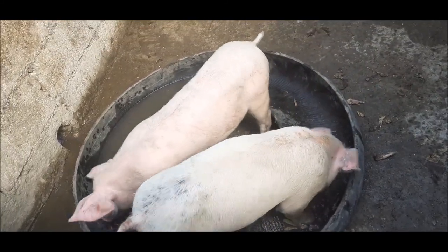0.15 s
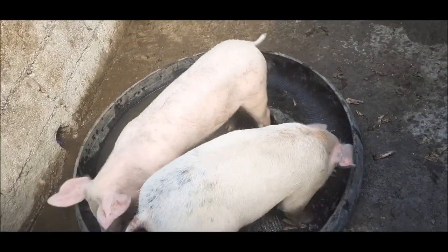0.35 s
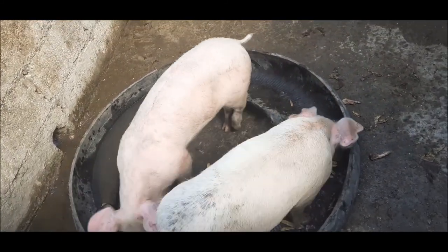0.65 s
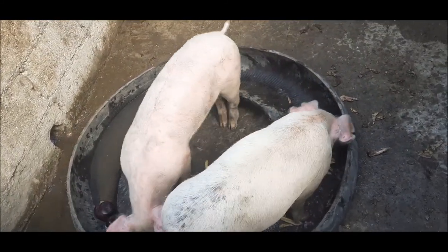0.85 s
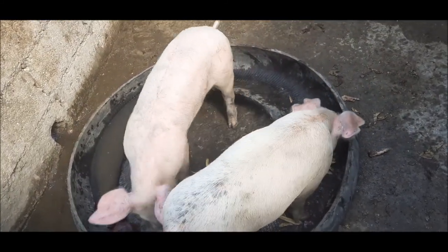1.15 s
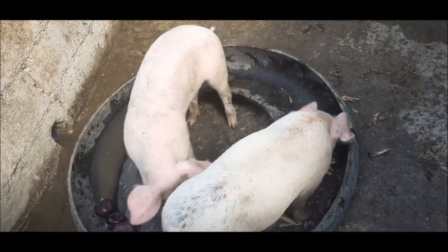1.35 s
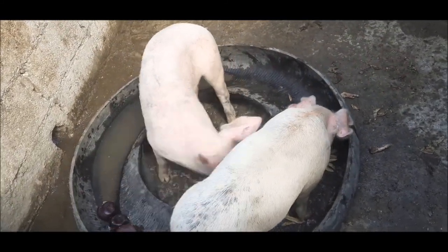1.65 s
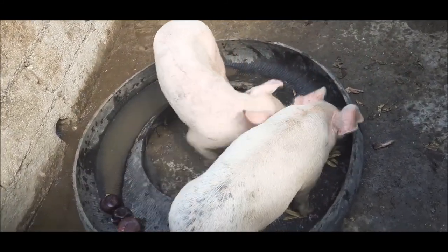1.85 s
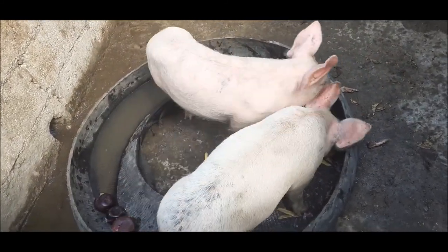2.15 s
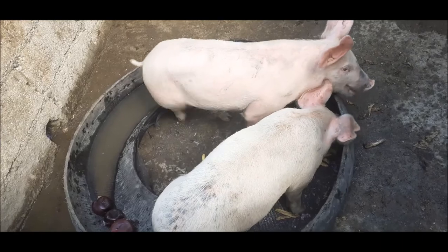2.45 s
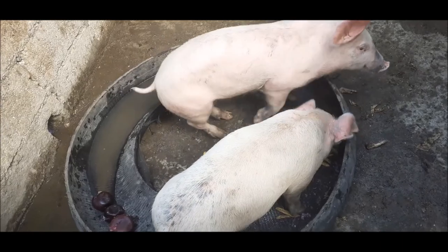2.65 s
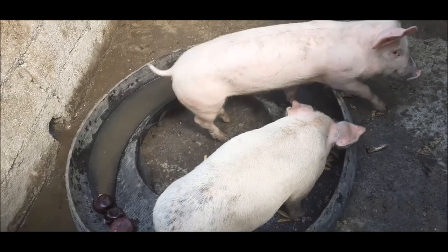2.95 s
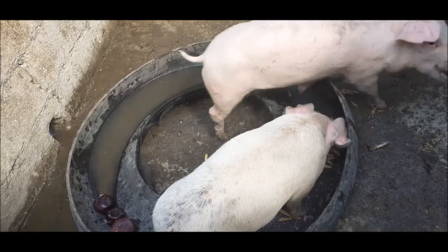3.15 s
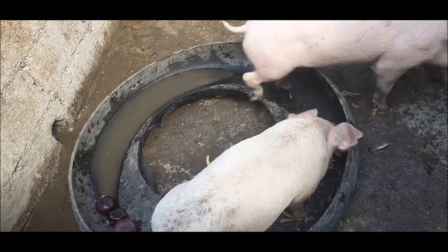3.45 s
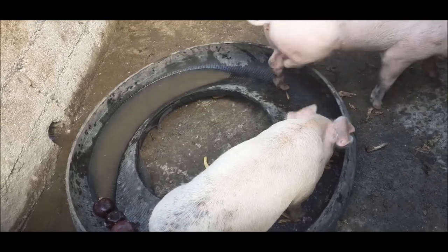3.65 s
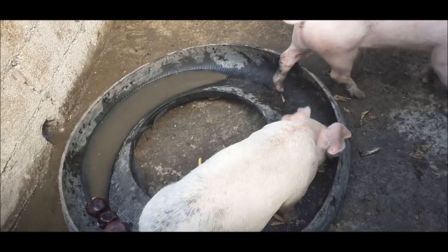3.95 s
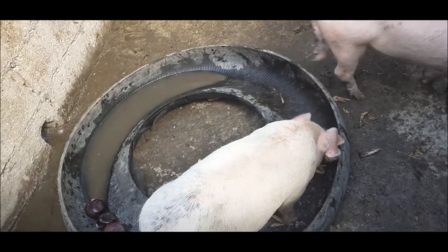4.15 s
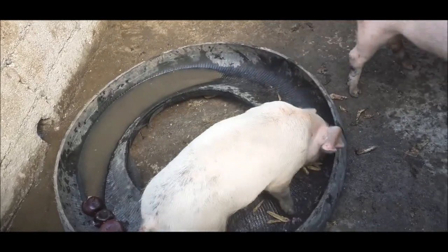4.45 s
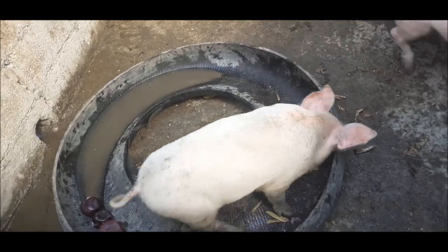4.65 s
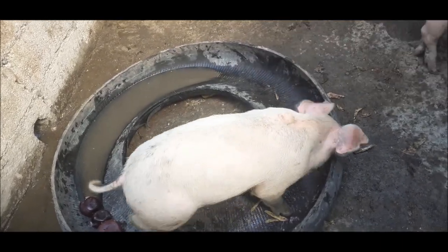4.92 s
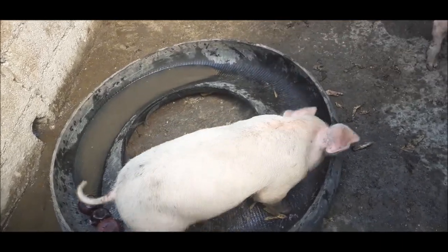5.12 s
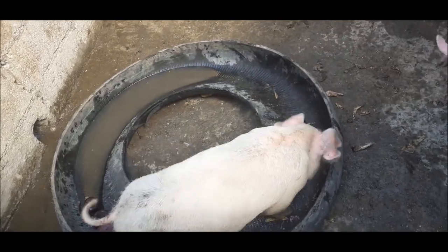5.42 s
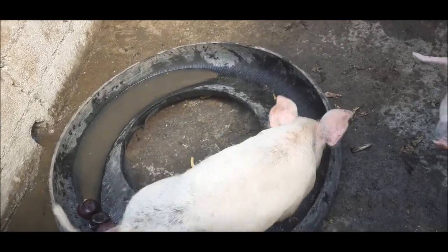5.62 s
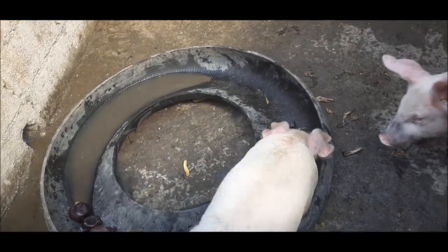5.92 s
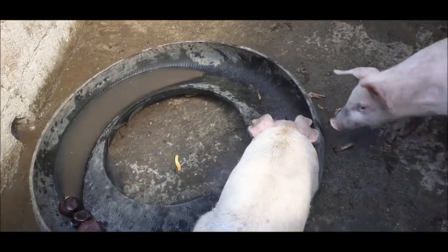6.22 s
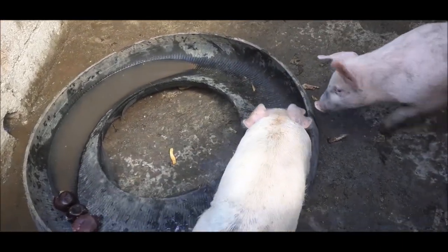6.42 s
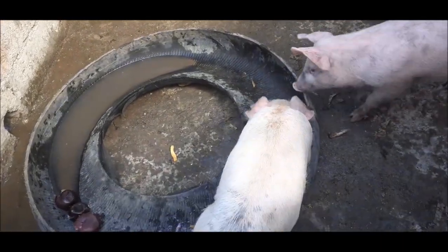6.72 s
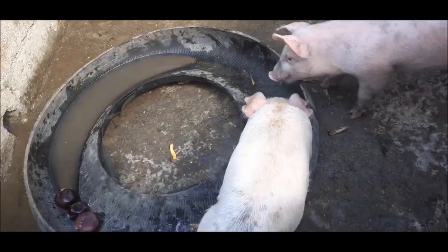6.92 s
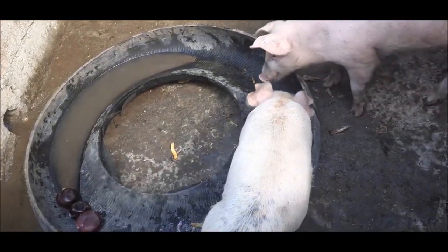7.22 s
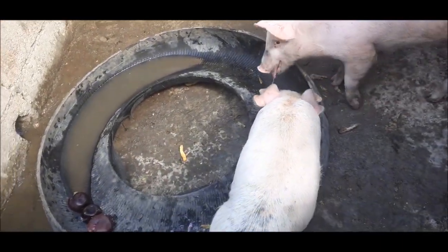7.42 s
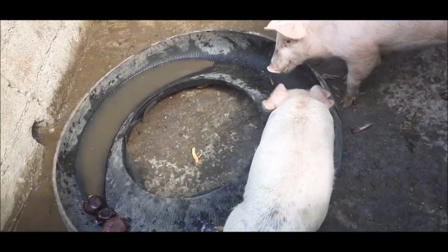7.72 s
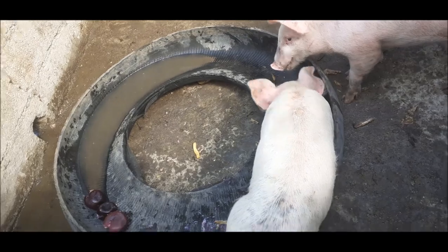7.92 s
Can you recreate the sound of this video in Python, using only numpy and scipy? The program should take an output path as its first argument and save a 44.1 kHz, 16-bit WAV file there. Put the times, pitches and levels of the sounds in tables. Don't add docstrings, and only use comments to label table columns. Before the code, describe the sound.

Two young pigs eat from a cut tyre in a small concrete sty. Soft wet smacks, tiny chews and nostril hiss come irregularly. A loud sharp clack with a hollow boom hits around two and a half seconds, then knocks, scuffs and slurps grow busier. Late on, a far insect sizzles and a piglet whines faintly. Close stereo microphone, trough louder on the right.

```python
import sys
import numpy as np
from scipy import signal
from scipy.fft import rfft, irfft, next_fast_len
from scipy.io import wavfile
from scipy.ndimage import uniform_filter1d, map_coordinates

SR = 44100
rng = np.random.default_rng(int(sys.argv[2]) if len(sys.argv) > 2 else 0)


def makeup_ratio(level_db):
    decades = np.asarray(level_db, float) / 20
    return 10 ** decades


def generate_wav(sig):
    pcm = np.round(np.clip(np.atleast_2d(sig).T, -1, 1) * 32767).astype(np.int16)
    wavfile.write(sys.argv[1], SR, pcm)


N = 356063
LAG = 19
SIZE = 8192

# pitch in Hz, width in Hz, level in dB.
TYRE_MODES = [(116.1, 24.7, -5.5), (209, 50, -6.5), (330, 58.5, -9), (514.5, 61, -8), (643, 450, -15),
              (815, 158, -7)]
# time in seconds, level in dB.
BODY_LEAN = [(0, -62.5), (.5, -74), (1.03, -61.5), (1.7, -68.5), (2.3, -59.5), (2.8, -55), (3.2, -52.5),
             (3.6, -58.5), (4.2, -53), (4.97, -80), (5.63, -67), (5.9, -49), (6.5, -53), (6.8, -63.5),
             (7.15, -64.5), (7.6, -62), (8.07, -53)]


def unit(x):
    return x / np.sqrt(np.mean(x ** 2, axis=-1, keepdims=True) + 1e-20)


def along(points, hz):
    f, value = np.transpose(points)
    return np.interp(np.log(hz + 1), np.log(f + 1), value)


def curves(rows):
    s, *columns = np.transpose(rows)
    return [np.interp(np.arange(N) / SR, s, column) for column in columns]


def wobble(rate):
    knots = rng.standard_normal(int(N * rate / SR) + 4)
    return map_coordinates(knots, [np.arange(N) * rate / SR])


def filtered(x, response):
    m = next_fast_len(x.shape[-1] + SIZE // 2)
    spectrum = rfft(x, m) * response(np.fft.rfftfreq(m, 1 / SR))
    return irfft(spectrum, m)[..., :x.shape[-1]]


def ring(f, hz, width):
    return 1j * f * width / (hz * hz - f * f + 1j * f * width)


def tyre(f):
    return sum((-1) ** k * makeup_ratio(db) * ring(f, hz, width) for k, (hz, width, db) in enumerate(TYRE_MODES))


def peak(rows):
    return rows / np.abs(rows).max(axis=1, keepdims=True)


def placed(times, db, rows):
    at = np.round(times * SR).astype(int)[:, None] + np.arange(SIZE)
    levelled = makeup_ratio(db)[:, None] * rows
    return np.bincount(at.ravel(), levelled.ravel(), N + SIZE)[:N]


def burst(t60, rise, spiky_db):
    t = np.arange(SIZE) / SR
    pop_db = spiky_db * rng.standard_normal((len(t60), SIZE // 64))
    pops = makeup_ratio(np.repeat(pop_db, 64, axis=1))
    fade = makeup_ratio(-60 * t / np.abs(t60)[:, None])
    return pops * rng.standard_normal(pops.shape) * fade * (1 - np.exp(-t / rise))


def surges(s, db, rise, t60):
    grid = np.arange(0, N / SR, 0.001)
    t = grid - s[:, None]
    fall = np.where(t < 0, -t / np.abs(rise)[:, None], t / np.abs(t60)[:, None])
    power = (makeup_ratio(db[:, None] - 60 * fall) ** 2).sum(axis=0)
    return np.interp(np.arange(N) / SR, grid, power)


def smacks():
    # start in seconds, peak in dB, mouth resonance in Hz, spray in dB, t60 in seconds.
    open_lips = [(0.05, -43, 6200, 8, 0.015), (0.128, -36, 2420, 5.5, 0.042),
                 (0.409, -38, 2670, 12.5, 0.05), (0.5818, -42, 1180, 11, 0.043),
                 (0.3001, -33.5, 3220, 12.5, 0.016), (0.9749, -46, 1410, 11.5, 0.1),
                 (1.423, -41.5, 1200, -12, 0.096), (1.498, -43, 4570, 6, 0.028),
                 (2.273, -65, 5100, 4, 0.0031), (2.44, -31, 1500, 5.5, 0.012),
                 (2.4705, -15.5, 2240, 0, 0.011), (2.49, -28, 1080, -8, 0.33),
                 (3.151, -35.5, 3600, -1, 0.039), (3.3577, -30.5, 1120, -17, 0.052),
                 (4.284, -38.5, 2160, 15, 0.023), (4.3879, -37.5, 1650, -2, 0.022),
                 (4.476, -39.5, 1400, 9, 0.037), (5.0103, -40.5, 2850, -6, 0.026),
                 (5.465, -53, 5500, 29, 0.011), (5.6985, -31.5, 1400, 3.5, 0.015),
                 (6.0356, -35.5, 5200, 8, 0.079), (6.6606, -30, 2400, 4.5, 0.042),
                 (7.923, -44, 2050, -5, 0.032)]
    # start in seconds, peak in dB, mouth resonance in Hz, t60 in seconds.
    closed_lips = [(.325, -42, 1520, 0.033), (0.4423, -38, 1680, 0.016), (0.6979, -37, 3040, 0.059),
                   (0.891, -43.5, 1320, 0.11), (1.0006, -46, 1980, 0.11), (1.121, -46.5, 1310, 0.02),
                   (1.552, -46, 1000, 0.05), (1.861, -40, 1280, 0.033), (1.929, -36, 840, 0.027),
                   (2.011, -42, 1260, 0.033), (2.801, -41.5, 1470, 0.014), (3.152, -44, 1660, 0.033),
                   (3.41, -38, 2900, 0.073), (3.8752, -35.5, 1510, 0.019), (4.176, -40.5, 1600, 0.026),
                   (4.2575, -35, 1310, 0.01), (5.1863, -42, 1830, 0.056), (5.334, -44, 1560, 0.048),
                   (5.3925, -43, 1900, 0.016), (5.5858, -40.5, 1310, 0.015), (5.837, -37, 3570, 0.024),
                   (6.011, -39.5, 1690, 0.071), (6.116, -39, 2720, 0.059), (6.34, -35.5, 1980, 0.077),
                   (6.3995, -31.5, 3420, 0.049), (6.809, -44, 1430, 0.019), (7.4487, -47.5, 2150, 0.026),
                   (8.0184, -40, 3030, 0.06), (.045, -44.5, 1600, 0.035), (.2144, -47, 2480, 0.013),
                   (0.483, -49, 1600, .015), (.5013, -49, 1530, 0.02), (.67, -51, 1430, 0.02),
                   (1.194, -54, 1660, 0.02), (2.629, -46, 3020, .03), (2.688, -46, 1530, 0.05),
                   (3.472, -55, 1500, 0.016), (3.6526, -44, 1170, 0.019), (3.824, -44, 1370, 0.027),
                   (4.7248, -49, 3180, 0.057), (4.9273, -49.5, 2300, 0.037), (5.197, -47, 2050, 0.03),
                   (5.374, -42, 2700, .025), (5.63, -51, 2000, .025), (6.1333, -44, 2280, 0.031),
                   (6.292, -52, 1330, 0.024), (6.936, -48, 2050, .03), (7.182, -48.5, 2560, 0.026),
                   (7.2212, -46, 1980, .03)]
    # frequency in Hz, level in dB per Hz.
    spray_colour = [(1500, -48), (2600, -12), (5000, 13.5), (8000, 12.5), (12000, 3), (16000, -23)]
    chews = [(s, db, hz, -24, t60) for s, db, hz, t60 in closed_lips]
    s, db, hz, spray_db, t60 = np.transpose(open_lips + chews)
    crackle = burst(t60, rise=0.0015, spiky_db=4.5)
    hz = hz[:, None]
    mouth = filtered(crackle, lambda f: ring(f, hz, 0.53 * hz) ** 2 - 0.14 * ring(f, 2.76 * hz, 0.78 * hz))
    spray = filtered(crackle, lambda f: makeup_ratio(along(spray_colour, f)))
    start = s - 0.001
    return placed(start, db + 0.19, peak(mouth)) + placed(start, db + spray_db - 10.0, peak(spray))


def munching(count=140):
    when, pitch, size, life = rng.random((count, 4)).T
    hz = 900 * makeup_ratio(18 * pitch)[:, None]
    pops = burst(0.003 + 0.042 * life, rise=0.0018, spiky_db=-1.0)
    chew = filtered(pops, lambda f: ring(f, hz, 0.58 * hz) ** 2)
    busy_db = 0.16 * (curves(BODY_LEAN)[0][(when * N).astype(int)] + 60)
    size_db = -4 * np.log(size + 0.15)
    return placed(when * N / SR, -56.0 + busy_db + size_db, peak(chew))


def slurps():
    # start in seconds, length in seconds, level in dB, growth to the end in dB,
    # brightness in dB per octave.
    sucks = [(0.036, 0.032, -74, -4, -2), (0.397, 0.04, -60, -5, 1.5), (2.46, .05, -47, -13, -2),
             (3.317, 0.023, -61, -12, -9), (3.402, 0.047, -54, 1, -9), (3.529, 0.043, -54, -4, -7.5),
             (4.248, 0.02, -46.5, -2, -0.5), (4.281, 0.03, -45, -5, -4), (4.386, 0.055, -52.5, 4, 2.5),
             (4.435, 0.017, -48, -3, -6), (4.476, 0.045, -50.5, -4, 4), (4.554, 0.04, -58, 4, 5.5),
             (4.715, 0.027, -58, 2, 5), (4.924, 0.025, -57, -6.5, -0.5), (5.067, 0.079, -55.5, -2, -2),
             (5.19, 0.017, -49, -6, -1), (5.261, 0.044, -56, -4, 0), (5.33, 0.067, -55, -3.5, -2),
             (5.55, 0.028, -54.5, -2, -1), (5.869, 0.03, -55, -3, -6), (5.97, 0.11, -50.5, -7.5, -2.5),
             (6.112, 0.043, -53, 3.5, -1.5), (6.19, 0.076, -54.5, 2, -4.5), (6.322, 0.017, -49.5, -3, -1),
             (6.356, 0.06, -57.5, 3, -2), (6.482, 0.039, -56, 1, -3), (6.564, 0.07, -69, 1, 2),
             (6.926, 0.018, -60, -3, 2), (7.177, .02, -57.5, -4, 2.5), (7.217, 0.017, -61, -7, -5),
             (7.403, 0.014, -58.5, -3, 2)]
    # frequency in Hz, level in dB per Hz.
    hiss_colour = [(1000, 2.5), (2200, 0.5), (4500, -2), (8000, -2), (12000, -6), (16000, -6)]
    s, length, db, grow_db, tilt_db = np.transpose(sucks)[..., None]
    t = np.arange(SIZE) / SR
    gate = np.clip(np.minimum(t / 0.002, (length - t) / 0.004), 0, 1)
    flow = burst(9 + 0 * s[:, 0], rise=0.001, spiky_db=3.5)

    def lips(f):
        return makeup_ratio(along(hiss_colour, f) + tilt_db * np.log2((f + 1) / 4000)) * (f > 700)

    hiss = unit(filtered(flow, lips))
    growth = makeup_ratio(grow_db * np.clip(t / length, 0, 1))
    return placed(s[:, 0], db[:, 0], hiss * gate * growth)


def gulps():
    # start in seconds, peak in dB, throat resonance in Hz, length in seconds.
    swallows = [(0.99, -48.5, 755, 0.15), (1.259, -45.5, 1110, 0.058), (2.96, -43, 950, 0.099),
                (4.138, -42.5, 477, 0.074), (4.5, -43.5, 560, 0.08), (6.201, -41, 350, 0.085),
                (6.209, -34.5, 702, 0.076), (6.342, -36.5, 686, 0.04), (7.751, -50.5, 600, 0.096)]
    s, db, hz, length = np.transpose(swallows)
    hz = hz[:, None]
    swell = np.sin(np.pi * np.clip(np.arange(SIZE) / SR / length[:, None], 0, 1))
    flow = swell * rng.standard_normal(swell.shape)
    return placed(s, db, peak(filtered(flow, lambda f: ring(f, hz, 0.31 * hz) ** 2)))


def notes():
    # start in seconds, peak in dB, pitch in Hz, length in seconds.
    hollow_notes = [(2.474, -17.5, 325, 0.0205), (2.585, -28.5, 480, 0.028), (1.42, -47, 1640, 0.023),
                    (1.552, -45.5, 1400, 0.03), (3.151, -41.5, 1700, 0.027), (3.15, -39.5, 3950, 0.013),
                    (3.24, -36, 600, 0.029), (4.535, -37, 465, 0.032), (6.245, -37.5, 364, 0.033),
                    (7.718, -45, 355, 0.081), (7.725, -45, 247, 0.09), (7.815, -48.5, 274, 0.038),
                    (7.85, -49, 345, 0.055), (7.92, -50, 1500, .014), (.308, -41.5, 1730, 0.015),
                    (3.37, -33.5, 390, 0.044), (5.24, -42, 186.5, 0.061), (2.68, -45.5, 7830, .02),
                    (4.64, -33.5, 108, 0.076), (2.35, -50, 111, .05)]
    s, db, hz, length = np.transpose(hollow_notes)[..., None]
    t = np.arange(SIZE) / SR
    unsteady = uniform_filter1d(rng.standard_normal((len(s), 2, SIZE)), size=300, axis=2)
    drift, flicker = unit(unsteady).transpose(1, 0, 2)
    swell = np.sqrt(np.sin(np.pi * np.clip(t / length, 0, 1)).clip(0)) * (t < length)
    tone = np.sin(2 * np.pi * np.cumsum(hz + 25 * drift, axis=1) / SR) * makeup_ratio(2 * flicker)
    return placed(s[:, 0], db[:, 0], peak(swell * tone))


def knocks():
    # start in seconds, peak in dB, hollow pitch in Hz, t60 in seconds.
    soft_blows = [(0.582, -38.5, 510, 0.15), (0.706, -32.5, 510, 0.022), (1.804, -43.5, 290, 0.19),
                  (2.008, -37.5, 302, 0.056), (2.494, -25, 610, 0.11), (2.565, -27, 464, 0.096),
                  (2.584, -34, 480, 0.46), (2.838, -39, 547, 0.11), (3.246, -33.5, 526, 0.09),
                  (3.364, -26, 320, 0.034), (3.379, -33.5, 420, 0.14), (3.475, -34, 483, 0.076),
                  (3.533, -40, 800, 0.092), (3.328, -42, 423, 0.013), (3.752, -32, 323, 0.033),
                  (4.253, -27.5, 313, 0.038), (4.434, -24.5, 338, 0.017), (4.806, -30.5, 350, 0.023),
                  (5.099, -30.5, 333, 0.021), (5.199, -35.5, 360, 0.048), (5.27, -31, 487, 0.049),
                  (5.335, -34, 383, 0.066), (5.697, -36, 356, 0.057), (5.77, -32.5, 364, 0.038),
                  (6.365, -37.5, 304, 0.1), (6.613, -33.5, 357, 0.016), (6.639, -38.5, 317, 0.031),
                  (0.584, -40, 212, 0.05), (0.704, -40.5, 202, 0.03), (2.847, -36.5, 220, 0.039),
                  (3.0, -36.5, 198, 0.077), (3.255, -32, 261, 0.032), (4.637, -39, 225, 0.1),
                  (4.298, -37, 500, 0.028), (5.15, -40, 342, .06), (5.365, -37, 400, .06),
                  (5.742, -36, 505, 0.045), (6.13, -37, 473, 0.071), (6.29, -47, 350, .04),
                  (2.725, -40.5, 420, 0.036), (2.508, -28.5, 330, 0.22), (3.422, -38.5, 182, 0.11),
                  (.19, -48.5, 446, 0.3)]
    s, db, hz, t60 = np.transpose(soft_blows)
    hz = hz[:, None]
    blow = burst(t60, rise=0.00035, spiky_db=2.5)

    def hollow(f):
        return (ring(f, hz, 0.15 * hz) + 0.023 * tyre(f)) * ring(f, 675, 1600)

    return placed(s, db + 0.54, peak(filtered(blow, hollow)))


def raps():
    # start in seconds, peak in dB, rim pitch in Hz.
    hard_blows = [(0.581, -41, 777), (0.7, -40, 1040), (1.807, -37, 730), (2.468, -23, 575),
                  (3.15, -39.5, 930), (3.245, -29.5, 794), (3.359, -27.5, 800), (3.748, -42.5, 720),
                  (4.283, -37, 810), (4.808, -21, 790), (5.054, -32.5, 750), (5.701, -37.5, 720),
                  (5.738, -39, 775), (6.071, -39, 710), (0.366, -42.5, 1640), (2.466, -28, 1590),
                  (2.4699, -13.5, 1580), (3.359, -30, 1780), (4.433, -39.5, 2050), (5.53, -39.5, 1940),
                  (6.341, -38, 420), (6.615, -41, 350), (4.3876, -40, 2060), (5.099, -37, 604),
                  (6.14, -42.5, 610), (3.3637, -27.5, 393), (4.2985, -40, 664), (3.482, -38, 850)]
    s, db, hz = np.transpose(hard_blows)
    hz = hz[:, None]
    scrape = burst(0.016 + 0 * s, rise=0.0091, spiky_db=6)
    blow = (np.arange(SIZE) == 0) + 0.017 * scrape

    def rim(f):
        modes = ring(f, hz, 0.18 * hz) - 0.22 * ring(f, 2.23 * hz, 0.5 * hz)
        return modes * ring(f, 0.85 * hz, 0.68 * hz)

    return placed(s, db + 5.5, peak(filtered(blow, rim)))


def booms():
    # start in seconds, peak in dB, t60 in seconds.
    swings = [(1.993, -46, 0.05), (2.5, -29, 0.38), (2.999, -47, 0.097), (3.449, -45.5, 0.25),
              (4.43, -47, 0.11), (4.69, -46.5, 0.2), (4.826, -46.5, 0.19), (2.71, -45.5, 0.6),
              (3.759, -57.5, 0.83), (6.621, -55, 0.8), (7.196, -55, 0.051), (7.757, -55, 0.49)]
    s, db, t60 = np.transpose(swings)
    t = np.arange(SIZE) / SR
    sway = unit(uniform_filter1d(rng.standard_normal((len(s), SIZE)), size=1500, axis=1))
    bent = t - 0.00162 * np.exp(-t / 0.04)
    swing = np.sin(2 * np.pi * TYRE_MODES[0][0] * bent + 0.5 * sway) * makeup_ratio(1.2 * sway[::-1])
    fade = np.cos(np.pi / 2 * t / t[-1]) * makeup_ratio(-60 * t / t60[:, None])
    return placed(s, db + 0.14, peak(swing * fade * (1 - np.exp(-t / 0.0099))))


def shoving():
    # peak time in seconds, peak in dB, rise over 60 dB in seconds, t60 in seconds,
    # wet scuff over the rumble in dB.
    shoves = [(.25, -49.5, .5, 0.36, -8), (0.588, -62.5, 3, 0.24, -17), (0.705, -55, -0.6, 0.76, -4),
              (1.44, -64.5, 0.8, 0.33, 2), (2.028, -51.5, 1.5, 1, -11), (2.42, -52.5, 0, 0.6, -23),
              (2.477, -29.5, 0.0747, 0.63, -11.5), (3.25, -59, 0.3, 0.15, -24),
              (3.362, -33, -0.52, 0.59, -10), (3.9, -53.5, 1.5, 1.2, -7), (4.245, -40, 0, 1.84, -12.5),
              (4.816, -44, 0.5, 0.53, -7), (5.08, -41.5, 0.38, 1.8, -6), (5.35, -43, 0.5, 1.27, -8.5),
              (5.772, -38.5, 0.2, 0.17, -11), (6.272, -45.5, 1.5, 0.11, -3.5),
              (6.62, -43.5, 0.7, 0.59, -10.5), (7.74, -47, -0.05, 0.66, -16)]
    # frequency in Hz, level in dB per Hz.
    scuff_colour = [(400, -12), (900, 11), (1600, 10.5), (2400, -3), (4000, -45), (9000, -75)]
    s, db, rise, t60, wet_db = np.transpose(shoves)
    lean = makeup_ratio(curves(BODY_LEAN)[0]) ** 2
    rub = np.sqrt(lean + surges(s, db, rise, t60))
    wet = np.sqrt(lean * makeup_ratio(2 * -5) + surges(s, db + wet_db, rise, t60))
    clumps = wobble(22)
    noise = rng.standard_normal((2, N))

    def rubber(f):
        return (tyre(f) + 0.063) * ring(f, 340, 475) * f * f / (f * f + 170 ** 2)

    judder_db = 1.2 * clumps + 3 * wobble(70)
    rumble = filtered(makeup_ratio(judder_db) * noise[0], rubber)
    grain_db = 1.5 * clumps + 7 * wobble(300)
    scuff = filtered(makeup_ratio(grain_db) * noise[1], lambda f: makeup_ratio(along(scuff_colour, f)))
    return rub * makeup_ratio(-2.5) * unit(rumble) + wet * makeup_ratio(-2.0) * unit(scuff)


def ticks():
    # start in seconds, peak in dB, pitch in Hz.
    grit_snaps = [(0.297, -36, 8150), (0.3655, -37.5, 4200), (.366, -43, 14000), (0.98, -44, 13500),
                  (0.68, -59, 8000), (0.6985, -30, 6530), (0.8375, -51, 8100), (0.8518, -36, 6350),
                  (1.9865, -33.5, 9400), (2.4693, -20, 6700), (2.5403, -37, 6200), (2.542, -27.5, 3000),
                  (2.594, -41, 8800), (.326, -39, 12000), (4.31, -39, 13600), (5.949, -35.5, 3500),
                  (6.0717, -37, 3500), (6.215, -40, 4500), (6.96, -45, 6200), (4.842, -25.5, 15100),
                  (5.355, -42, 7500), (4.845, -38, 14400), (5.4635, -36, 10000), (5.9755, -33, 12000),
                  (6.3994, -26.5, 9100), (2.273, -32.5, 4100), (4.3875, -43, 3980), (4.513, -31, 8300)]
    s, db, hz = np.transpose(grit_snaps)
    hz = hz[:, None]
    splinters = burst(0.008 + 0 * s, rise=0.0003, spiky_db=5)
    snap = (np.arange(SIZE) == 0) + 0.2 * splinters
    return placed(s, db + 2.5, peak(filtered(snap, lambda f: ring(f, hz, 0.52 * hz))))


def snuffling():
    # peak time in seconds, peak in dB, rise over 60 dB in seconds, t60 in seconds.
    sniffs = [(.43, -63, 6, 0.2), (.6, -54, -0.5, 0.2), (0.702, -75, -3, 0.25), (1.82, -63, -3.5, 6.6),
              (2.4, -63.5, 6, 1.3), (2.688, -56, -3, 0.096), (6.04, -59, 5, 8), (6.05, -63, -11, 0.24),
              (7.946, -57.5, 3.5, 0.24), (8.05, -58, 5.5, .9)]
    # time in seconds, level in dB.
    steady_air = [(0, -84), (.74, -61.5), (1.8, -66), (2.37, -81), (2.6, -62.5), (4.09, -59.5), (4.15, -70),
                  (4.3, -56.5), (5.6, -63), (6.7, -59), (6.75, -63), (6.8, -60.5), (8.07, -67)]
    # frequency in Hz, level in dB per Hz.
    air_colour = [(1500, 4), (3000, 10.5), (6000, 9), (9000, 9), (13000, 3.5), (16000, 4)]
    flutter_db = 1.5 * wobble(40) + 2.5 * wobble(400)
    noise = makeup_ratio(flutter_db) * rng.standard_normal((2, N))
    a, b = filtered(noise, lambda f: makeup_ratio(along(air_colour, f)))
    level = np.sqrt(makeup_ratio(curves(steady_air)[0]) ** 2 + surges(*np.transpose(sniffs)))
    return level * unit(np.array([a, np.roll(a, -LAG) + 3.9 * b]))


def whine():
    # time in seconds, octave pitch in Hz, level in dB.
    cry = [
        (6.82, 1857, -67),
        (7.154, 1807, -76),
        (7.16, 1950, -67),
    ]
    before = (cry[0][0] - 0.03, cry[0][1], -99)
    after = (cry[-1][0] + 0.044, cry[-1][1], -99)
    hz, db = curves([before] + cry + [after])
    phase = np.pi * np.cumsum(hz * (1 + 0.0155 * wobble(50))) / SR
    return makeup_ratio(db - 5 + 3.3 * wobble(40)) * (np.sin(2 * phase) + 0.46 * np.sin(phase))


def insect():
    # start in seconds, end in seconds, closing level in dB.
    phrases = [
        (5.55, 6.03, -60),
        (6.03, 6.79, -53),
        (6.904, 7.368, -53.5),
        (7.505, 7.86, -53),
        (7.946, 8.3, -50.5),
    ]
    start, end, db = np.transpose(phrases)[..., None]
    t = np.arange(N) / SR
    outside = np.maximum(start - t, 0) + np.maximum(t - end, 0)
    level_db = (db - 7 * np.abs(end - t) - 124 * outside).max(axis=0)

    def wings(f):
        return abs(ring(f, 13150, 1800)) ** 2 + 0.3 * abs(ring(f, 14700, 2000)) ** 2

    sizzle = filtered(rng.standard_normal((2, N)), wings)
    pulse_hz = 12 + 2 * wobble(5)
    throb_db = 1.5 * wobble(25) + 3 * np.sin(2 * np.pi * np.cumsum(pulse_hz) / SR)
    return makeup_ratio(level_db - 3.5 + throb_db) * unit(sizzle)


def breeze():
    # time in seconds, level in dB.
    gusts = [(0, -83), (.78, -75.5), (.99, -84), (2.0, -72.5), (2.45, -67), (2.54, -63), (2.81, -64),
             (3.1, -58.5), (4.04, -70.5), (4.32, -57.5), (4.65, -65), (4.81, -62.5), (6.68, -69),
             (7.03, -78), (7.19, -59.5), (7.28, -80.5), (7.9, -63), (8.07, -76)]
    a, b = unit(filtered(rng.standard_normal((2, N)), lambda f: ring(f, 69.7, 84) ** 3))
    return makeup_ratio(curves(gusts)[0] - 3.5 + 2.0 * wobble(5.2)) * np.array([a, a + 1.23 * b])


def yard():
    # frequency in Hz, level in dB per Hz.
    yard_colour = [(15, -50), (30, -69), (250, -2), (334, -3), (590, -7), (1000, -6), (1700, -8),
                   (2200, -13), (8500, -13.5), (16000, -15)]
    a, b = filtered(rng.standard_normal((2, N)), lambda f: makeup_ratio(along(yard_colour, f)))
    shared = filtered(a - b, lambda f: 1 / (1 + (f / 500) ** 2))
    port_db = np.array([[-0.3], [3.5]])
    return makeup_ratio(-57 + port_db + 1.5 * wobble(2.94)) * unit(np.array([a, b + 0.25 * shared]))


def sty(x):
    # frequency in Hz, t60 in seconds.
    wall_t60 = [(100, 0.7), (500, 0.098), (2000, 0.079), (10000, 0.072)]
    hz, t, z = signal.stft(rng.standard_normal((2, SR // 2)), SR, nperseg=256)
    fade = makeup_ratio(-60 * t / along(wall_t60, hz)[:, None])
    tail = signal.istft(z * fade, SR, nperseg=256)[1]
    late = np.pad(x, (180, 0))[None]
    return signal.fftconvolve(late, tail / np.linalg.norm(tail[0]), axes=1)[:, :N]


def ports(x):
    near = np.pad(x, (LAG, LAG))
    left = near[LAG // 2:][:N]
    right = near[LAG // 2 + LAG:][:N]
    return np.array([left, right])


def scene():
    bright = smacks() + munching() + whine()
    low = knocks() + raps() + booms() + shoving() + gulps()
    grit = ticks()
    shared, own = slurps(), slurps()
    sucked = np.array([np.roll(shared, LAG) + 0.13 * own, shared - 1.46 * own])
    echo = sty(low)
    alike = filtered(echo[0] - echo[1], lambda f: 1 / (1 + (f / 300) ** 4))
    low_walls = echo + np.array([0 * alike, alike])
    walls = makeup_ratio(2.0) * sty(bright + 0.43 * grit) + makeup_ratio(-9.0) * low_walls
    air = walls + sucked + snuffling() + breeze()
    far = insect() + makeup_ratio(-6.5) * yard()
    port_gain = makeup_ratio([[-3.1], [2.6]])
    return port_gain * (air + ports(bright + grit + low + notes())) + far


def band_limit(x):
    return signal.sosfilt(signal.butter(12, 15800, fs=SR, output="sos"), x)


def record(dry):
    # frequency in Hz, level in dB.
    housing = [(22, -12), (52, 1.5), (8800, 0.68), (9600, -4), (10600, -3), (12500, -1), (15000, -2)]
    heard = filtered(dry, lambda f: makeup_ratio(along(housing, f)) * (f < 15800))
    return band_limit(heard)


dry = scene()
out = record(dry)
generate_wav(out)
```